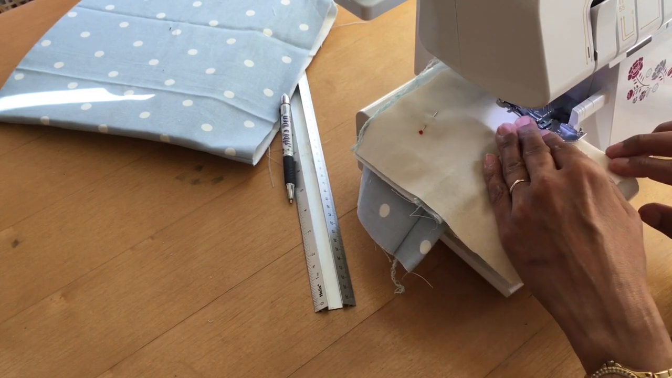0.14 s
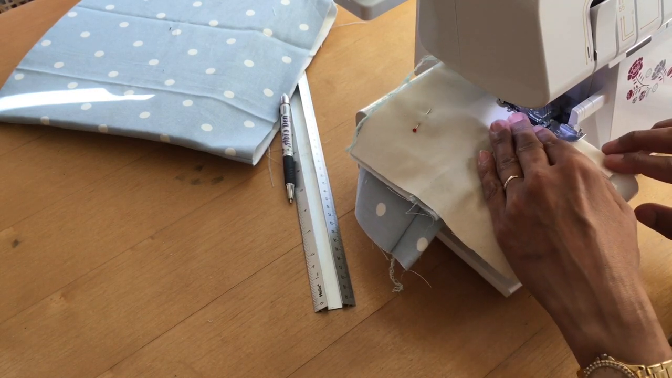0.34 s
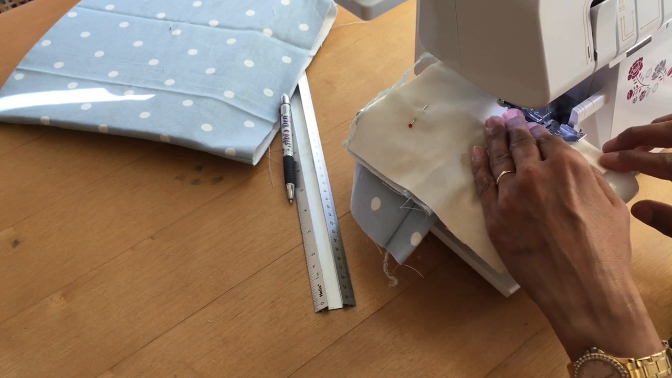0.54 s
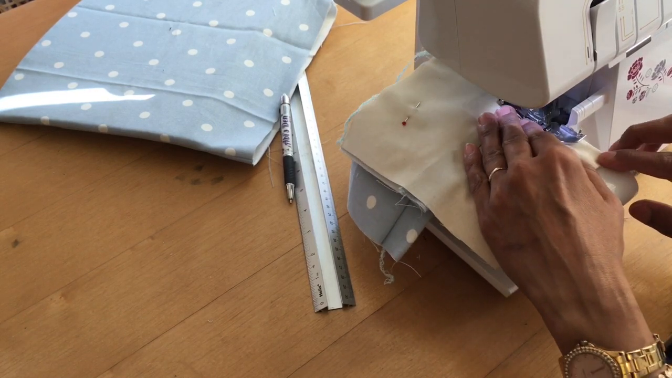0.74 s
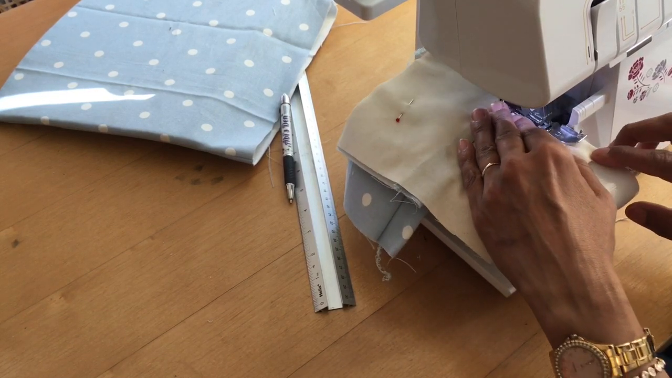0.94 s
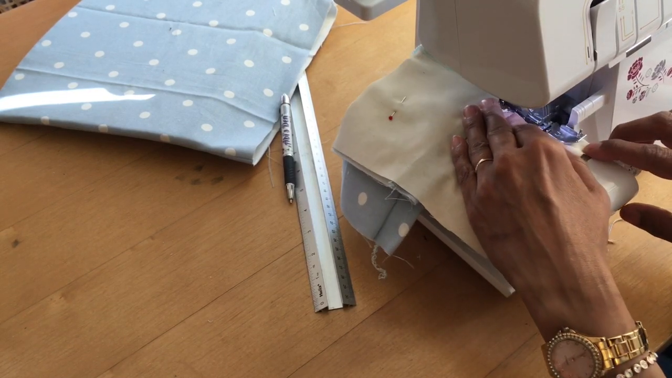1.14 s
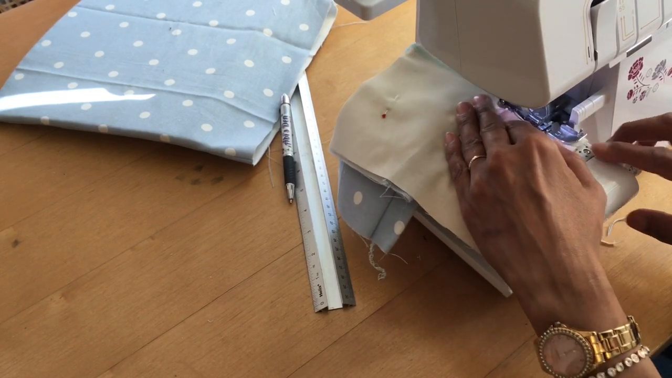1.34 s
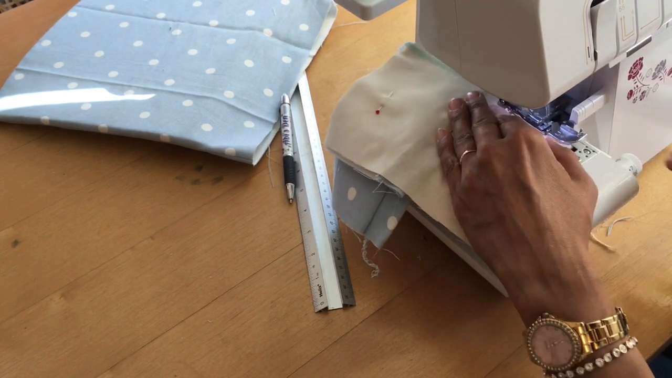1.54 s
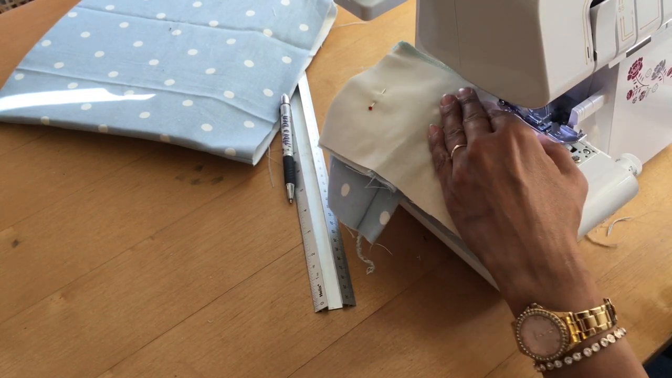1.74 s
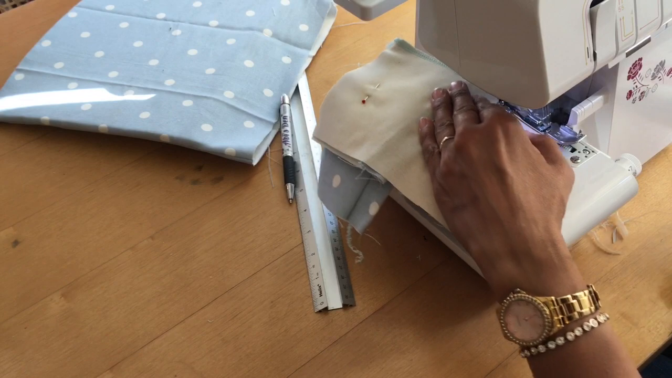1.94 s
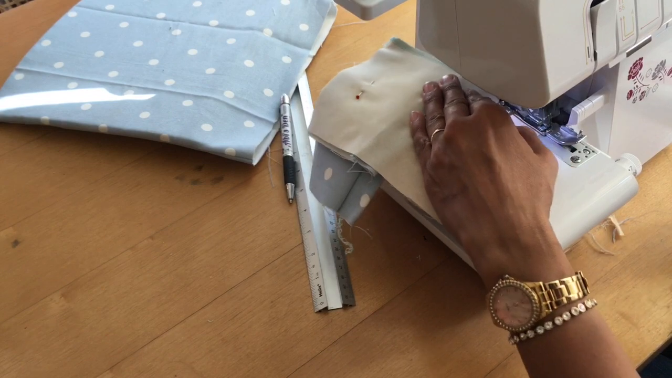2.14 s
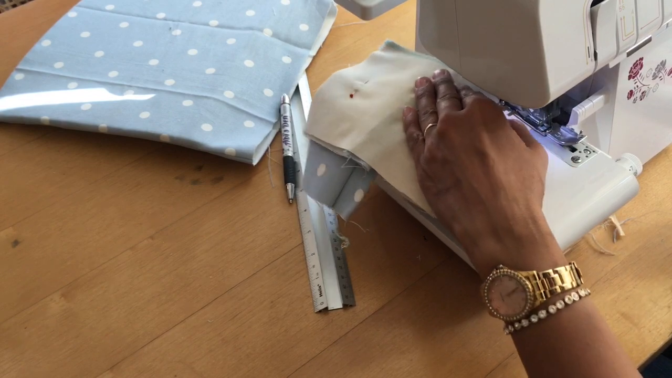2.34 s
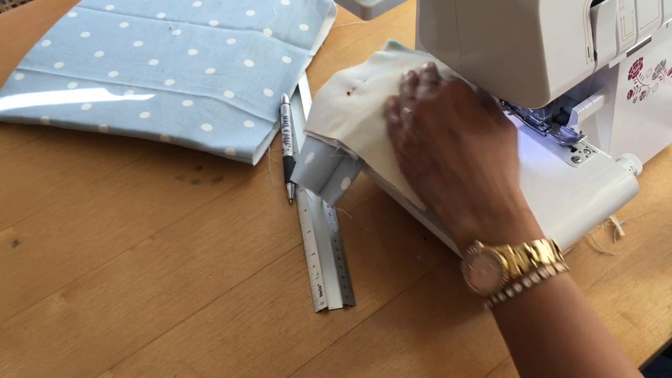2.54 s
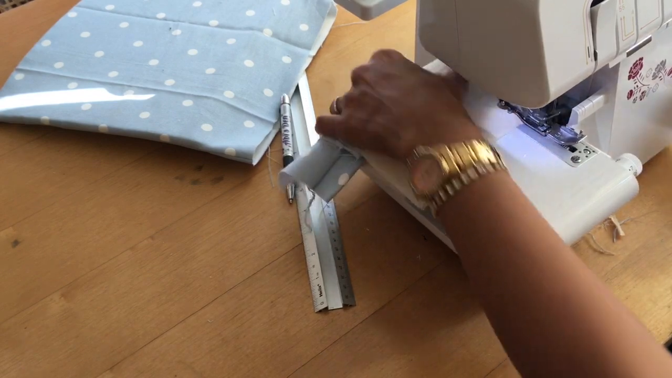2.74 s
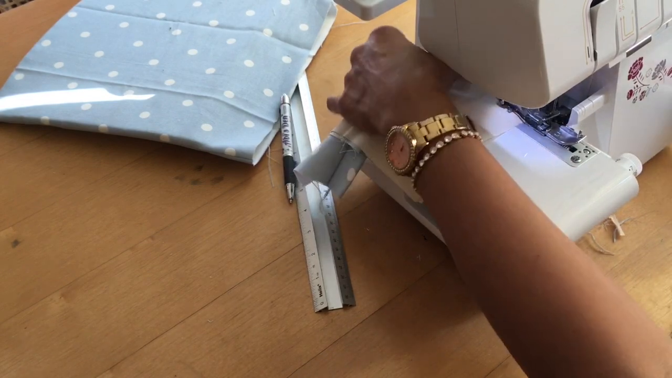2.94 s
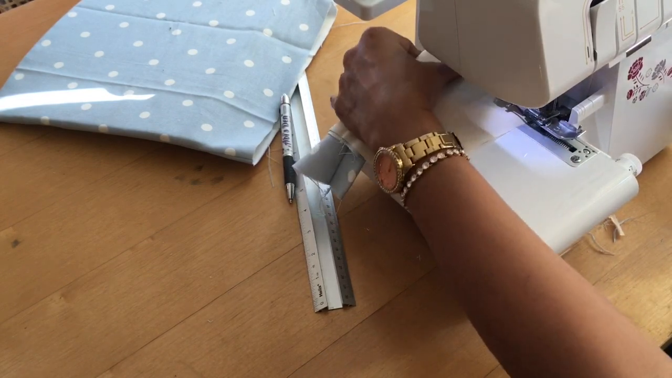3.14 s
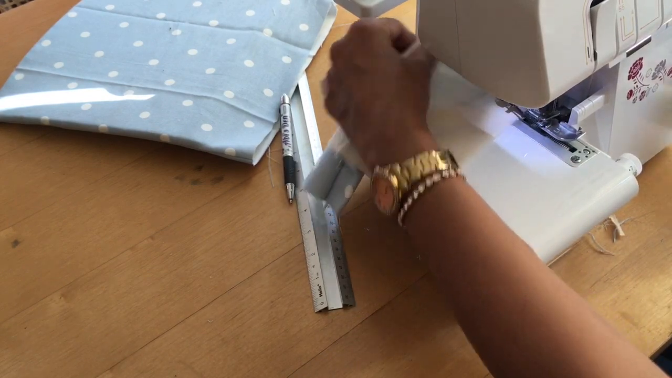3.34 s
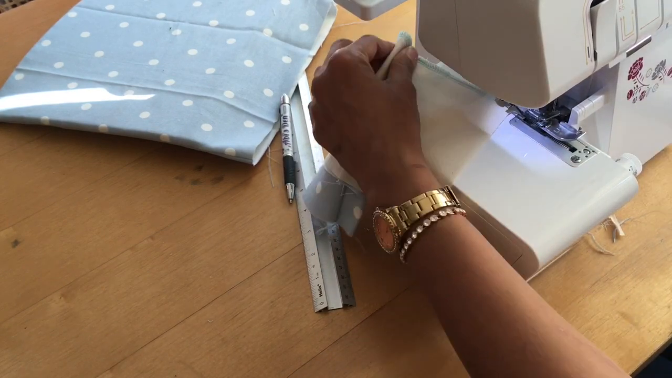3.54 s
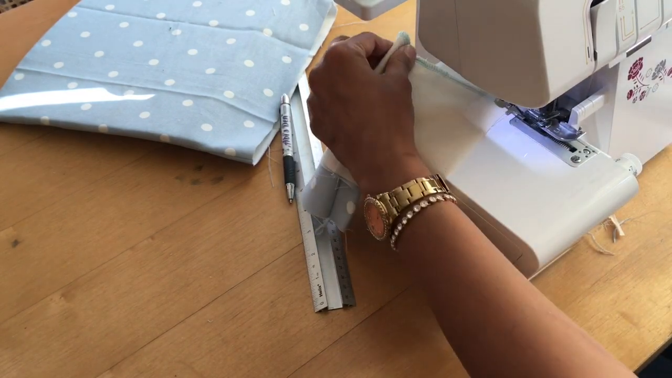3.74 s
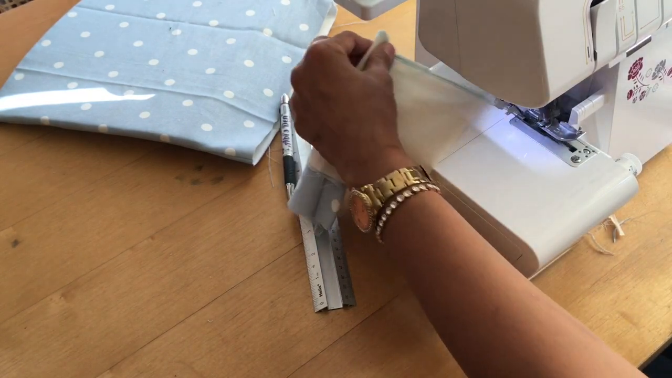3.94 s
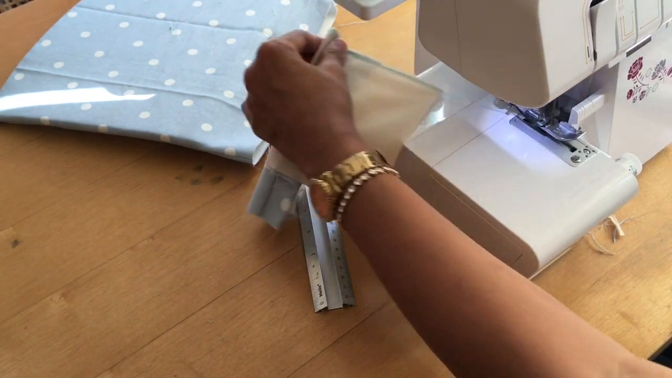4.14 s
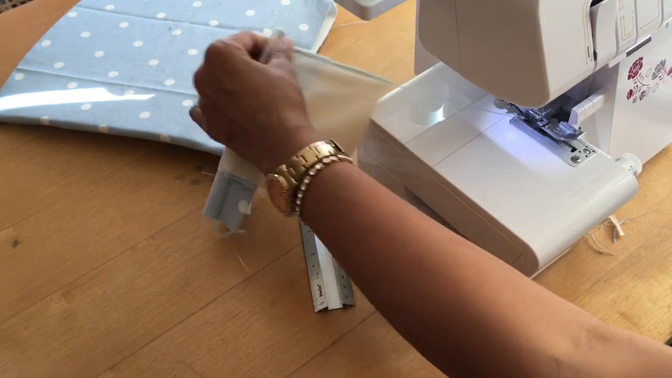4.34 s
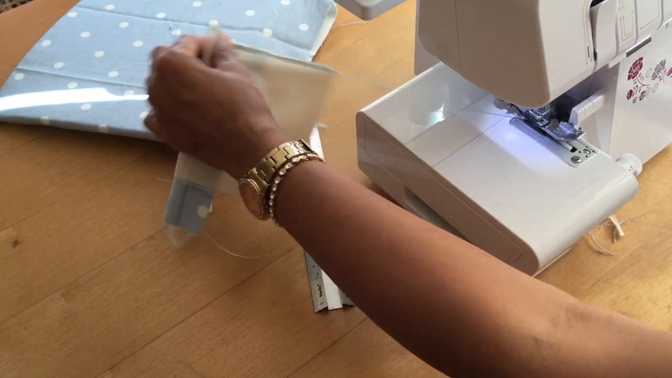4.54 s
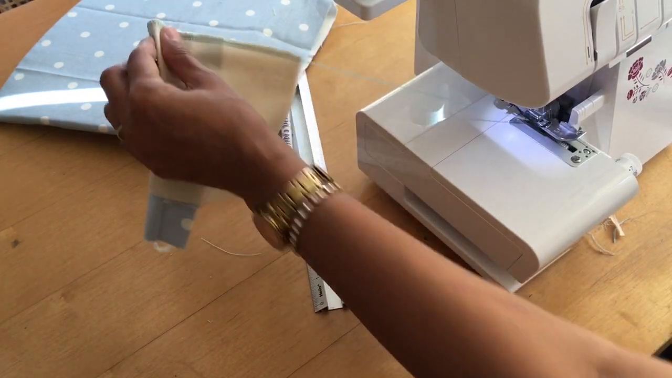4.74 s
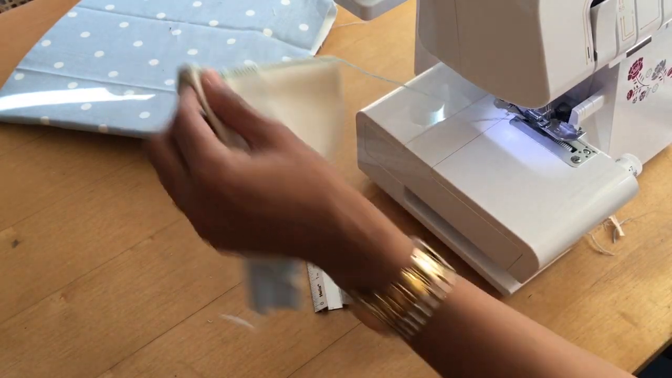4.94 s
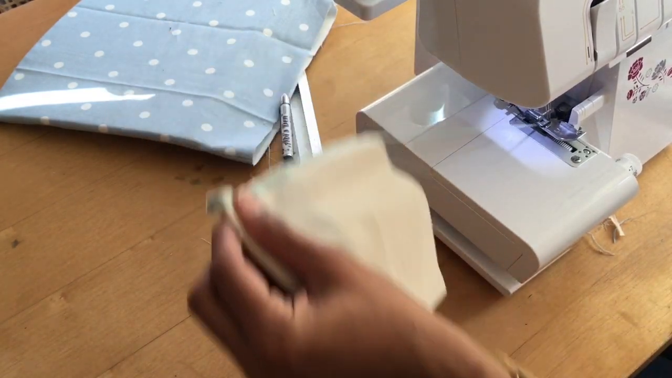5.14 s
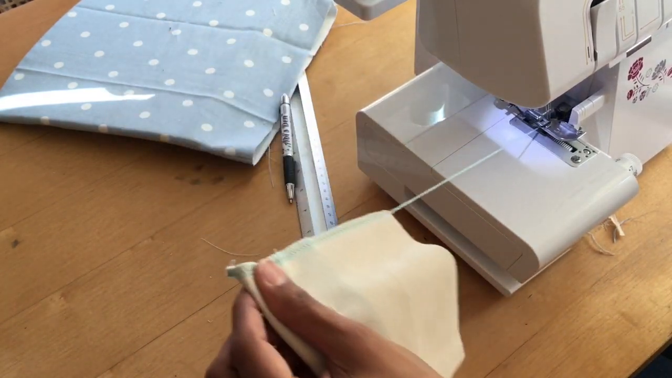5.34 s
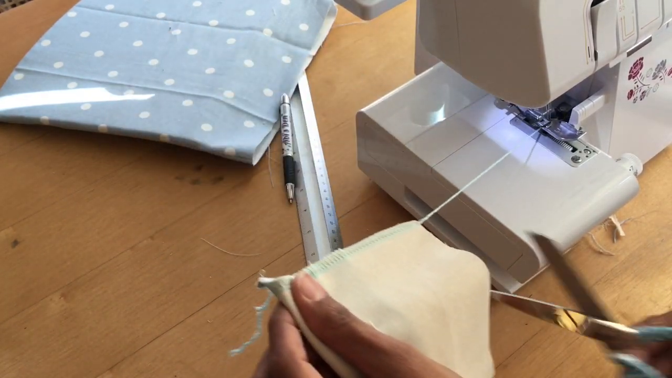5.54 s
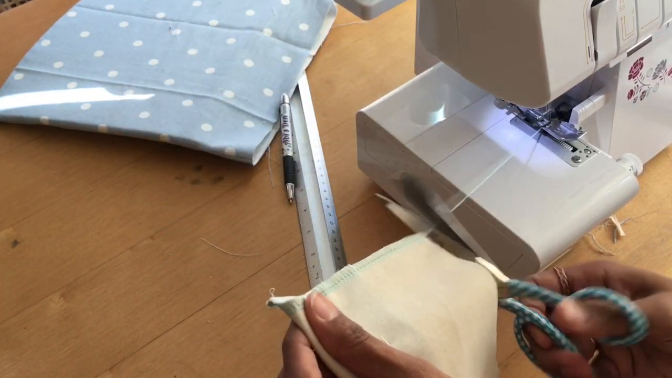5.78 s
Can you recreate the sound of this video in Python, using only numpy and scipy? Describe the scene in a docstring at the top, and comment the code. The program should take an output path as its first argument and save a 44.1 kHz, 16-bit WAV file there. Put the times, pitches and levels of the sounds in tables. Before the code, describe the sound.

An overlock sewing machine rattles quickly, slows to a few knocks, runs again and stops, then scissors snip once.

```python
"""Overlocker seam and scissor snip.

An overlocker on a wooden table sews and trims a seam, slows, inches on with a few knocks, then runs
more slowly to chain off the thread. Each shaft turn repeats the same contacts, which thump the table,
rattle the housing and tick in the steel. The knife crunches until the cloth runs out; then feed and
foot clack. Cloth rustles as it is drawn away; scissors snip the chain in a small, quiet room."""
import sys
import numpy as np
from scipy import signal
from scipy.fft import rfft, irfft, next_fast_len
from scipy.io import wavfile
from scipy.ndimage import uniform_filter1d, map_coordinates

SR = 44100
rng = np.random.default_rng(int(sys.argv[2]) if len(sys.argv) > 2 else 0)


def bounce(signal):
    """Save signal as a 16-bit WAV file at the path given by the first command-line argument."""
    frames = np.transpose(np.atleast_2d(signal))
    limited = np.clip(frames, -1, 1)
    pcm = np.round(limited * 32767).astype(np.int16)
    wavfile.write(sys.argv[1], SR, pcm)


N = 256220
TIME_S = np.arange(N) / SR
STRIKE_S = TIME_S[:SR // 4]
TOP_HZ = 16000
FULL_SPEED_HZ, CUT_STITCHES = 14.4, 29  # one stitch per shaft turn
FLUTTER_DB, WANDER_CYCLES, FLUTTER_RATE_HZ = 2.3, .16, 14
MOTOR_RISE_S, REBOUND_S = 0.037, .0045

# room air spectrum (frequency [Hz], level [dB])
AIR_SPECTRUM = [(15, -37), (25, -7), (64, -3.5), (180, -9.5), (223, -25.5), (344, -8), (489, -24.5),
                (1020, -30), (1610, -32.5), (2610, -26), (4870, -30), (6380, -28.5), (13600, -27.5),
                (16000, -30)]
# room decay (frequency [Hz], t60 [s])
ROOM_DECAY = [(120, 0.73), (1000, 0.25), (5000, 0.072), (15000, 0.1)]

# shaft travel: seam, inching, chaining off (time [s], position [turns])
SEAM_TURNS = [(0, -.15), (.56, 7), (.785, 10), (1.487, 20), (2.373, 32.75), (2.445, 33.75), (2.537, 34.75),
              (2.622, 35.38), (2.7, 35.75), (2.8, 36.15), (2.85, 36.2)]
INCHING_TURNS = [(2.92, 36.21), (3.099, 36.38), (3.274, 36.75), (3.43, 36.93), (3.73, 37.03)]
CHAIN_TURNS = [(3.8, 37.18), (3.84, 37.4), (3.881, 37.75), (4.089, 39.75), (4.179, 40.75), (4.456, 43.75),
               (4.649, 45.75), (4.74, 46.38), (4.853, 46.75), (4.99, 47.07), (5.15, 47.14)]
SHAFT_TURNS = SEAM_TURNS + INCHING_TURNS + CHAIN_TURNS
# cloth load: high at the start, swelling again at a thick spot, low on bare thread,
# dipping at the restart (time [s], load [dB])
CLOTH_LOAD = [(0, 2.5), (.35, 2), (.85, 0), (1.05, 1.5), (1.4, -0.5), (1.85, -1), (2.3, -2), (3.7, -9.5),
              (3.82, -14.5), (3.89, -4), (4.9, -5)]
# level laws (level at full speed [dB], speed slope [dB/decade], load slope [dB/dB])
THUMP_LAW, CLATTER_LAW, TICK_LAW = (-33.5, 13.1, 0.91), (-25.5, 24.6, 0.69), (-33.5, 32.5, 0.75)
CLACK_LAW, BITE_LAW = (-11.5, 11.3, 0.34), (-21.5, 30, 0.32)

# shaft hum and table drone envelopes (time [s], level [dB])
HUM_LEVELS = [(0.0, -26), (0.25, -35), (0.74, -38), (0.81, -50), (1.02, -24), (1.46, -37), (2.58, -37.5),
              (3.01, -64), (3.17, -50), (3.48, -69), (4.02, -30), (4.67, -45.5), (5.1, -58)]
DRONE_LEVELS = [(0.0, -31), (0.55, -27.5), (0.7, -42), (0.8, -32.5), (1.4, -43.5), (2.34, -44),
                (2.48, -37.5), (2.68, -36), (2.91, -56), (3.18, -46), (3.65, -82), (3.76, -48),
                (3.96, -35.5), (4.13, -48.5), (4.65, -39), (4.9, -45), (5.04, -74)]
# frame response and motor buzz lines (frequency [Hz], level [dB])
FRAME_RESPONSE = [(125, -28), (142, -18), (152, -5), (159, 6), (168, -18.5), (177, -13), (186, 0.5),
                  (194, 0), (215, -26.5), (255, -26), (272, -6.5), (290, -18)]
BUZZ_LINES = [(100, -2), (200, 1.5), (300, 1), (400, 1.5)]
# pedal presses (down [s], up [s], buzz level [dB])
PEDAL_PRESSES = [(-1, 2.82, -53), (3.755, 4.98, -54.5)]

# swells of belt, table, cloth and scissors (peak time [s], level [dB], rise [s], t60 [s])
BELT_BRAKING = [(2.775, -39.5, 0.088, 0.21), (4.815, -41.5, 0.19, 0.153)]
BELT_SLIPS = [(3.875, -32.5, 0.095, .1)]
TABLE_RUMBLES = [(3.16, -49.5, .2, 0.44), (3.765, -43, .1, .9)]
CLOTH_PULLS = [(2.57, -55, .3, 0.197), (3.13, -40, 0.091, 0.29), (3.895, -30.5, 0.16, 0.21),
               (5.05, -60, 0.51, 1.26), (5.55, -68.5, 0.38, 6.6)]
SCISSOR_STROKES = [(5.46, -52, 0.068, 0.12), (5.5155, -21, 0.013, 0.11)]
SCISSOR_SCRAPES = [(5.533, -38, .04, 0.046), (5.557, -42.5, .05, .07)]
# friction spectra (frequency [Hz], level [dB])
BRAKING_SPECTRUM = [(800, -56), (1300, 6), (1750, 3.5), (2300, -24), (4000, -36)]
SLIP_SPECTRUM = [(1900, -60), (2450, -6), (2650, 5), (2900, -15), (3600, -41)]
SCRAPE_SPECTRUM = [(900, -34), (1400, -19), (2550, -14), (3200, -34), (4400, -25), (5000, -8), (5650, -6),
                   (6200, -7), (7000, -24), (15000, -23)]
RUSTLE_SPECTRUM = [(800, 0), (4000, -9.5), (9000, -10), (14000, -9)]
# thread and handling ticks (time [s], level [dB])
HANDLING_TICKS = [(3.239, -41), (3.741, -49), (5.1144, -46.5), (5.179, -49), (5.606, -49)]
# resonances of the closing scissors (frequency [Hz], width [Hz], level [dB])
SCISSOR_RESONANCES = [(2470, 330, -19), (3520, 80, -8.5), (4610, 70, -6.5), (5020, 100, -8),
                      (5700, 140, -6), (6200, 130, -3), (7100, 90, -5), (7990, 120, 2), (8300, 160, 3.5),
                      (8740, 100, 2), (10840, 350, -3), (11460, 200, 2), (12080, 230, 5.5),
                      (13300, 160, 4.5), (14130, 130, 2), (14700, 180, 0), (15500, 200, 3)]

# modes of scissors, casing, knife arm and needle plate (frequency [Hz], level [dB], t60 [s])
BLADE_MODES = [(6520, -13.5, 0.045), (9900, -23, .035), (10900, -24, .031), (11380, 5, 0.036),
               (13750, -23, .057)]
EDGE_MODES = [(3480, -5, .04), (7250, 1, .025), (14700, 1, .03)]
CASING_MODES = [(638, -11, .07), (813, 2, 0.047), (956, -4, .045), (1155, -4.5, .05), (1305, 0.5, 0.056),
                (1860, -12, 0.056), (2420, -20, 0.039), (2740, 0.5, 0.025), (3720, -16.5, 0.055)]
ARM_MODES = [(1335, 1.5, 0.034), (1590, -11, .03)]
PLATE_MODES = [(1310, -23, 0.068), (1685, -10, 0.063), (2760, -15.5, 0.046), (3140, -10, 0.042),
               (4380, -6.5, 0.026), (6490, -10.5, 0.045), (9500, -10, 0.027), (10800, -5, 0.016),
               (11600, -15, 0.02)]
# impact spectra (frequency [Hz], level [dB])
TABLE_SPECTRUM = [(22, -69.5), (29, -47), (42, -15), (56, -5.5), (72, -7.5), (88, -12.5), (99, -13.5),
                  (115, -3), (130, -2.5), (146, -3.5), (162, -3), (188, -7), (225, -13.5), (400, -64)]
HOUSING_SPECTRUM = [(25, -47), (130, -23), (210, -4.5), (250, -8), (305, 0.5), (335, -4.5), (370, 1.5),
                    (410, 0), (450, -1.5), (520, -5), (630, -0.5), (950, -4), (1400, -5.5), (2000, -10),
                    (3600, -14.5), (6000, -28)]
STEEL_SPECTRUM = [(2000, -35), (4000, 5), (5000, 2), (5700, 6), (6600, 4.5), (7300, -1), (9400, 3),
                  (10400, -1.5), (12000, 4), (16000, -5)]
FOOT_SPECTRUM = [(1500, -11.5), (2400, 5), (2850, 5.5), (3400, 2), (4300, -0.5), (5600, 3), (7400, -2.5),
                 (8900, 6.5), (10300, -4), (12000, 7), (13800, 0.5), (15500, 7.5)]
THUD_SPECTRUM = [(25, -55), (100, -45), (250, -7), (500, -3.5), (850, -4), (1250, -7.5), (1700, -18),
                 (2400, -53), (5000, -47)]
RAP_SPECTRUM = [(800, 5), (1700, 3.5), (2050, 6.5), (2450, 7.5), (2900, 1), (3300, -1), (3700, 2),
                (4500, -14), (8000, -36.5)]
CRUNCH_SPECTRUM = [(400, -31.5), (1400, 8.5), (2700, 12), (5000, -0.5), (9000, -3.5), (16000, 4)]
OPENING_SPECTRUM = [(1500, -48), (5000, -32), (15000, -13.5)]
SNIP_SPECTRUM = [(1500, -36.5), (3500, -21.5), (6000, 0.5), (15000, -6.5)]

# knocks of slow mechanism and handling
# (time [s], level [dB], rap [dB], edge [dB], casing [dB], hardness [dB/octave])
SLOW_KNOCKS = [(2.819, -35, -6, -1.5, -9, 2), (2.914, -39, -9, -9, -6, -2), (2.938, -39.5, -4, 4.5, -6, -1),
               (2.955, -29.5, -4, 3, -6, -2), (2.994, -39, 3, 10.5, -3.5, 13.5),
               (3.07, -37.5, -6, -14, -8, 4), (3.099, -23, -3, 2, -4.5, -0.5),
               (3.275, -31, -3.5, -19, -6, 3), (3.376, -31, -9, -7.5, 0.5, -4),
               (3.575, -44.5, -18, -14, -9.5, -31), (3.661, -35.5, -16, -2, -3.5, -5),
               (4.929, -30.5, -32, -17, -3.5, -21), (4.964, -46, -26, -22, -17, -12)]
# knife bites in tougher cloth (time [s], crunch [dB], squeak [dB])
TOUGH_BITES = [(0.324, -32, -23), (0.402, -33, -19.5), (.559, -34, -15.5), (0.635, -25, -22),
               (0.709, -18, -17.5), (0.783, -36.5, -18.5), (0.997, -14.5, -39), (1.0639, -14.5, -29),
               (1.205, -22.5, -18), (1.484, -18.5, -14), (1.551, -22, -22), (1.624, -32, -16.5),
               (1.836, -20.5, -20.5), (2.044, -19, -18)]
# knife arm knocks at the fold (time [s], level [dB])
FOLD_KNOCKS = [(0.346, -16), (0.479, -15), (.556, -17.5), (0.632, -18), (.711, -15), (.851, -28),
               (0.996, -15)]
# feed on foot, twice a turn (phase [turns], level [dB], housing [dB], t60 [s])
FEED_CLACKS = [(.38, -10.5, -3, 0.054), (.75, -7.5, -5, 0.034)]
# individual steel clacks, from sharp accents to faint ones as the machine slows
# (time [s], level [dB], crack [dB], rebound [dB], body [dB])
SINGLE_CLACKS = [(2.108, -20.5, -11, 0.5, 4.5), (2.1646, -24.5, 9.5, -9, -4), (2.2075, -19, 3.5, -6.5, -15),
                 (2.227, -20, -0.5, -8, -15), (2.2357, -16, 6, -9, -15.5), (2.2777, -25, 0, -7.5, -15.5),
                 (2.3054, -16.5, 8, -14, -14), (2.346, -24, 4, -7.5, -13.5), (2.373, -16, 8.5, -11, -2.5),
                 (2.416, -20, 6, -3, -12), (2.4454, -18, 3.5, -12.5, -7), (2.4982, -22, 0, -11, -3),
                 (2.538, -19, -1.5, -14.5, -12), (2.581, -28, -7, -2, 6.5), (2.5975, -24, -3, -2, -3),
                 (2.621, -32, 0, -19, -2), (2.664, -35, 1, -9.5, -12), (2.7015, -30, 1.5, -16.5, 1.5),
                 (3.987, -28, -11, 6, 7), (4.0882, -24.5, -10, 3, 3), (4.1789, -24.5, 0, -2, -5),
                 (4.241, -30, -2, -5, -3), (4.2714, -21, -3.5, 1, -4), (4.3633, -21, -2, 5.5, 1.5),
                 (4.4548, -21.5, -7, 8, -0.5), (4.6508, -24, -5, 4.5, 3), (4.7411, -36, 2, -3, 6.5),
                 (4.8532, -42.5, -4, -9.5, 1.5)]
# loose levers and covers (phase [turns], frequency [Hz], level [dB], t60 [s])
LOOSE_PARTS = [(-.12, 3734, -3.5, 0.032), (-.1, 1596, 3.5, 0.018), (-.05, 1342, -3.5, 0.066),
               (0.072, 1722, -6, 0.043), (0.219, 615.5, -6.5, 0.068), (0.301, 3237, -7.5, 0.033),
               (0.36, 433, -14.5, 0.23), (0.452, 1010, 1.5, 0.017), (0.561, 4520, -7, 0.026),
               (0.62, 3375, -5, 0.016)]
# contacts of knife, needles, loopers and feed (phase [turns], thump [dB], clatter [dB], tick [dB])
TURN_CONTACTS = [(0, -38.5, 1, 21.5), (.07, 3, 1, 23.5), (.14, 8, 0.5, -22), (.25, 3.5, 0.5, 20),
                 (.39, -39.5, 3, 24), (.52, -0.5, -0.5, 16), (.61, -48, 3, 21), (.75, -1.5, -5, -24.5),
                 (.83, -2.5, -3.5, 15), (.91, 2.5, 2, 24)]


def amp(db):
    """Decibels to gain."""
    return 10 ** (np.asarray(db) / 20)


def unit(x):
    """Scale to rms 1."""
    return x / np.sqrt(np.mean(x ** 2) + 1e-20)


def even(x):
    """Unit power over a few stitches; keeps the beat within them."""
    power = uniform_filter1d(uniform_filter1d(x ** 2, size=6200), size=4000)
    return x / np.sqrt(np.abs(power) + 1e-12)


def at_hz(points, hz):
    """Interpolate on a log frequency axis."""
    knots_hz, values = np.transpose(points)
    return np.interp(np.log(hz + 1), np.log(knots_hz + 1), values)


def curve(points):
    """Interpolate (time, value) points to every sample."""
    return np.interp(TIME_S, *np.transpose(points))


def colour(x, spectrum):
    """Minimum-phase filter with the given spectrum."""
    size = 2 * next_fast_len(len(x) // 2 + 4096)
    cepstrum = irfft(np.log(amp(at_hz(spectrum, np.fft.rfftfreq(size, 1 / SR)))))
    cepstrum[1:size // 2] *= 2
    cepstrum[size // 2 + 1:] = 0
    return irfft(rfft(x, size) * np.exp(rfft(cepstrum)))[:len(x)]


def noise(spectrum, gain=1):
    """Coloured noise at rms 1, modulated by gain before the filter."""
    return unit(colour(gain * rng.standard_normal(N), spectrum))


def grain(depth_db, samples):
    """Fast random gain of friction."""
    return amp(depth_db * unit(uniform_filter1d(rng.standard_normal(N), size=samples)))


def wobble():
    """Smooth random curve at the flutter rate."""
    knots = rng.standard_normal(int(N * FLUTTER_RATE_HZ / SR) + 4)
    return map_coordinates(knots, [TIME_S * FLUTTER_RATE_HZ])


def wandering_sine(cycles):
    """Sine with drifting phase."""
    return np.sin(2 * np.pi * (cycles + WANDER_CYCLES * wobble() + rng.random()))


def waver(hz):
    """Tone passed on unsteadily by shaking parts."""
    return amp(FLUTTER_DB * wobble()) * wandering_sine(hz * TIME_S)


def swell(start_s, end_s, rise_s, t60_s):
    """Gain: climbs 60 dB in rise_s, holds from start to end, decays."""
    return amp(-60 * (np.maximum(start_s - TIME_S, 0) / rise_s + np.maximum(TIME_S - end_s, 0) / t60_s))


def swells(rows):
    """Summed gain of swells that peak and fade."""
    return sum(amp(db) * swell(at_s, at_s, rise_s, t60_s) for at_s, db, rise_s, t60_s in rows)


def add(out, at_s, x):
    """Mix x into out."""
    start = max(round(at_s * SR), 0)
    out[start:start + len(x)] += x[:max(N - start, 0)]


def fade(t60_s):
    """Exponential decay, 0.25 s long."""
    return amp(-60 * STRIKE_S / t60_s)


def burst(t60_s):
    """Dense modes struck at once: decaying noise, flat spectrum."""
    envelope = fade(t60_s)
    x = rng.standard_normal(len(envelope)) * envelope
    whitened = irfft(np.exp(1j * np.angle(rfft(x))), len(x))
    return whitened * envelope ** .25 * np.linalg.norm(envelope)


def hit(spectrum, t60_s):
    """Coloured burst, peak about 1; each blow favours other resonances."""
    knots_hz = np.geomspace(2000, TOP_HZ + 2000, 45) - 2000
    hz = np.geomspace(60, TOP_HZ, 200)
    ripple_db = np.interp(hz, knots_hz, 3 * rng.standard_normal(len(knots_hz)))
    attack = 1 - np.exp(-STRIKE_S / 0.0005)
    x = colour(burst(t60_s) * attack, np.column_stack([hz, at_hz(spectrum, hz) + ripple_db]))
    return x / (2.5 * np.sqrt(np.mean(x[:SR // 200] ** 2)))


def ring(modes, spread=0.0036):
    """Struck part; mode level, tuning and phase vary per blow."""
    out = 0
    for hz, db, t60_s in modes:
        size, detune, phase = rng.standard_normal(3)
        tone = np.sin(2 * np.pi * (hz * (1 + spread * detune) * STRIKE_S + phase))
        out += amp(db + 2 * size) * fade(t60_s) * tone
    return out * (1 - np.exp(-STRIKE_S / 0.0018))


def passes_s(phase):
    """Times at which the shaft passes this phase of its turn."""
    times_s, turns = np.transpose(SHAFT_TURNS)
    return np.interp(np.arange(np.ceil(turns[-1] - phase)) + phase, turns, times_s)


def shaft_hz(samples):
    """Shaft speed, averaged over this many samples."""
    return np.abs(uniform_filter1d(np.gradient(curve(SHAFT_TURNS)) * SR, size=samples))


def drive(law):
    """Gain rising with shaft speed and cloth load."""
    full_db, speed_slope, load_slope = law
    decades = np.log10(shaft_hz(SR // 25) / FULL_SPEED_HZ + 1e-6)
    return amp(full_db + speed_slope * decades + load_slope * curve(CLOTH_LOAD))


def room(x):
    """Short reverberation; treble dies first."""
    hz, times_s, bins = signal.stft(rng.standard_normal(SR // 2), SR, nperseg=256)
    decay = amp(-60 * times_s / at_hz(ROOM_DECAY, hz)[:, None])
    tail = signal.istft(bins * decay, SR, nperseg=256)[1]
    return signal.fftconvolve(x, np.pad(tail, (300, 0)) / np.linalg.norm(tail))[:N]


def motor():
    """Magnetic buzz at twice mains frequency and harmonics; surges at each pedal press."""
    lines = sum(amp(db) * waver(hz) for hz, db in BUZZ_LINES)
    current = 0
    for down_s, up_s, db in PEDAL_PRESSES:
        surge_db = 11 * np.exp(-np.abs(TIME_S - down_s) / .2)
        current += amp(db + surge_db) * swell(down_s, up_s, MOTOR_RISE_S, t60_s=0.24)
    return current * unit(lines)


def hum():
    """Shaft imbalance drives the frame at multiples of the stitch rate; the table drones at one pitch."""
    turns, speed_hz = curve(SHAFT_TURNS), shaft_hz(SR // 10)
    orders = sum(amp(at_hz(FRAME_RESPONSE, k * speed_hz)) * wandering_sine(k * turns)
                 for k in range(10, 20))
    drone = amp(curve(DRONE_LEVELS) - 2.5) * unit(waver(hz=128.3))
    running = swell(0, PEDAL_PRESSES[-1][1], MOTOR_RISE_S, t60_s=.35)
    return running * (amp(curve(HUM_LEVELS) - 4.5) * orders + drone)


def table_rumble():
    """The table rumbles under a leaning hand and the starting motor."""
    return swells(TABLE_RUMBLES) * noise(TABLE_SPECTRUM)


def belt():
    """The belt whirrs on braking and squeaks on taking up the shaft."""
    return swells(BELT_BRAKING) * noise(BRAKING_SPECTRUM) + swells(BELT_SLIPS) * noise(SLIP_SPECTRUM)


def cloth():
    """Fibres catch and release as the piece is pulled; thread and handling tick."""
    out = swells(CLOTH_PULLS) * noise(RUSTLE_SPECTRUM, grain(depth_db=3, samples=150))
    for at_s, db in HANDLING_TICKS:
        add(out, at_s, amp(db) * hit(STEEL_SPECTRUM, t60_s=0.034))
    return out


def scissors():
    """Blades click open, stick and slip, part the thread and chatter home."""
    chatter = grain(depth_db=4, samples=60)
    catches = unit(rng.standard_normal(N) * (rng.random(N) < .15))
    hz = np.fft.rfftfreq(N, 1 / SR)
    steel = sum((-1) ** k * amp(db) * 1j * hz * width_hz / (mode_hz ** 2 - hz ** 2 + 1j * hz * width_hz)
                for k, (mode_hz, width_hz, db) in enumerate(SCISSOR_RESONANCES))
    steel /= np.sqrt(np.mean(np.abs(steel) ** 2))
    out = irfft(rfft(swells(SCISSOR_STROKES) * catches) * steel, N)
    out += swells(SCISSOR_SCRAPES) * noise(SCRAPE_SPECTRUM, chatter)
    edges_meet = amp(-35.5) * ring(EDGE_MODES, spread=.002)
    thread_parts = amp(-25) * hit(SNIP_SPECTRUM, t60_s=0.016)
    opening = amp(-29) * ring(BLADE_MODES, spread=.002) + amp(-24.5) * hit(OPENING_SPECTRUM, t60_s=0.021)
    add(out, 5.414, opening)
    add(out, 5.5105, edges_meet)
    add(out, 5.5175, thread_parts)
    return out


def knocks():
    """At a crawl, contacts fall singly and ring the casing; harder blows favour high modes."""
    out = np.zeros(N)
    for at_s, db, rap_db, edge_db, casing_db, hardness in SLOW_KNOCKS:
        thud = hit(THUD_SPECTRUM, t60_s=0.077)
        rap = amp(rap_db + 4) * hit(RAP_SPECTRUM, t60_s=0.099)
        edge = amp(edge_db) * (hit(STEEL_SPECTRUM, t60_s=0.044) + amp(-5) * ring(PLATE_MODES))
        modes = [(hz, mode_db + hardness * np.log2(hz / 1000), t60_s)
                 for hz, mode_db, t60_s in CASING_MODES]
        casing = amp(casing_db) * ring(modes, spread=.004)
        add(out, at_s, amp(db - 1.5) * (thud + rap + edge + casing))
    return out


def knife(scatter_db=1.5, squeak_hz=9580):
    """One crunch through the weave per turn; the blade squeaks in tough cloth, its arm knocks at folds."""
    out, force = np.zeros(N), drive(BITE_LAW)
    crunch = lambda: hit(CRUNCH_SPECTRUM, t60_s=0.11)
    for at_s in passes_s(0)[1:CUT_STITCHES]:
        add(out, at_s, np.interp(at_s, TIME_S, force) * amp(scatter_db * rng.normal()) * crunch())
    for at_s, crunch_db, squeak_db in TOUGH_BITES:
        hz = squeak_hz + 130 * rng.normal()
        band = [(hz - 1200, -35), (hz - 350, -6), (hz, 0), (hz + 500, -35)]
        squeak = unit(colour(rng.standard_normal(len(STRIKE_S)), band))
        squeak *= fade(t60_s=0.026) * (1 - np.exp(-STRIKE_S / 0.00077))
        add(out, at_s, amp(crunch_db) * crunch() + amp(squeak_db) * squeak)
    for at_s, db in FOLD_KNOCKS:
        add(out, at_s, amp(db) * ring(ARM_MODES))
    return out


def clacks(scatter_db=0.8):
    """Once the cloth runs out, feed and foot meet steel on steel, bounce and ring the needle plate."""
    out, force = np.zeros(N), drive(CLACK_LAW)
    for phase, db, housing_db, t60_s in FEED_CLACKS:
        for at_s in passes_s(phase)[CUT_STITCHES:]:
            gain = np.interp(at_s, TIME_S, force) * amp(db - scatter_db * rng.normal())
            click = hit(FOOT_SPECTRUM, t60_s)
            housing = amp(housing_db) * hit(HOUSING_SPECTRUM, 4.3 * t60_s)
            add(out, at_s, gain * (click + housing + amp(-4) * ring(PLATE_MODES)))
            add(out, at_s + REBOUND_S * rng.uniform(0.24, 1), gain * amp(-12.5) * click)
    for at_s, db, crack_db, rebound_db, body_db in SINGLE_CLACKS:
        click = hit(FOOT_SPECTRUM, t60_s=0.027)
        crack = amp(crack_db) * hit(FOOT_SPECTRUM, t60_s=.009)
        body = hit(HOUSING_SPECTRUM, t60_s=0.15) + amp(-3.5) * ring(PLATE_MODES)
        add(out, at_s, amp(db) * (crack + click + amp(body_db) * body))
        add(out, at_s + REBOUND_S, amp(db + rebound_db) * click)
    return out


def loose_parts():
    """Levers and covers ring once a turn, varying in strength and tuning."""
    out, time_s = np.zeros(N), TIME_S[:SR // 8]
    for phase, hz, db, t60_s in LOOSE_PARTS:
        envelope = amp(db - 60 * time_s / t60_s) * (1 - np.exp(-time_s / 0.0014))
        for at_s in passes_s(phase):
            size, detune, offset = rng.standard_normal(3)
            tone = np.sin(2 * np.pi * (hz * (1 + .007 * detune) * time_s + offset))
            add(out, at_s, amp(2.5 * size) * envelope * tone)
    return out


def thumps(levels_db, scatter_db, slack_s, rub_db):
    """Reversing masses push on the table each turn, jittered by drive play, over rubbing noise."""
    out = np.zeros(N)
    for (phase, *_), db in zip(TURN_CONTACTS, levels_db):
        times_s = passes_s(phase)
        late, size = rng.standard_normal((2, len(times_s)))
        out[(np.abs(times_s + slack_s * late) * SR).astype(int)] += amp(db + scatter_db * size)
    return unit(out) + amp(rub_db) * rng.standard_normal(N)


def linkage(levels_db, t60_s, alike, scatter_db, slack_s, rub_db):
    """Each contact partly repeats its own ring once a turn, over the rub of gears and belt."""
    out = np.zeros(N)
    for (phase, *_), db in zip(TURN_CONTACTS, levels_db):
        own = burst(t60_s)
        for at_s in passes_s(phase):
            strike = np.sqrt(alike) * own + np.sqrt(1 - alike) * burst(t60_s)
            add(out, at_s + slack_s * rng.normal(), amp(db + scatter_db * rng.normal()) * strike)
    return unit(out) + amp(rub_db) * rng.standard_normal(N)


def mechanism():
    """Contacts thump the table, rattle the housing and tick in the steel parts."""
    _, thump_db, clatter_db, tick_db = np.transpose(TURN_CONTACTS)
    thump = thumps(thump_db, scatter_db=2, slack_s=.0005, rub_db=-4)
    clatter = linkage(clatter_db, t60_s=.058, alike=.7, scatter_db=1.2, slack_s=.00025, rub_db=-4)
    tick = linkage(tick_db, t60_s=.05, alike=.3, scatter_db=1.6, slack_s=.0005, rub_db=-4)
    rattle = unit(colour(clatter, HOUSING_SPECTRUM)) + amp(7.5) * loose_parts()
    return (drive(THUMP_LAW) * even(colour(thump, TABLE_SPECTRUM))
            + drive(CLATTER_LAW) * even(rattle)
            + drive(TICK_LAW) * even(colour(tick, STEEL_SPECTRUM)))


def scene():
    """Machine, hands and room air; close, mono."""
    running = mechanism() + motor() + belt() + table_rumble()
    events = clacks() + knife() + knocks() + cloth()
    snip = scissors()
    air = amp(-60.5) * noise(AIR_SPECTRUM)
    direct = running + hum() + events + snip
    reverb = room(amp(-16) * running + amp(-9) * events + amp(-15.5) * snip)
    return (direct + reverb + air)[None]


def record(dry):
    """Brick-wall low-pass at TOP_HZ."""
    size = next_fast_len(N + SR // 2)
    passband = np.fft.rfftfreq(size, 1 / SR) < TOP_HZ
    return irfft(rfft(dry, size) * passband, size)[:, :N]


dry = scene()
out = record(dry)
bounce(out)
```